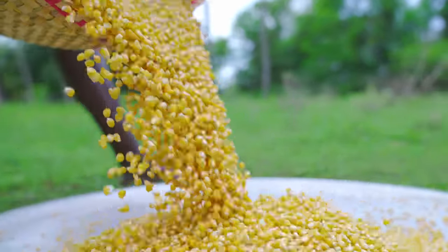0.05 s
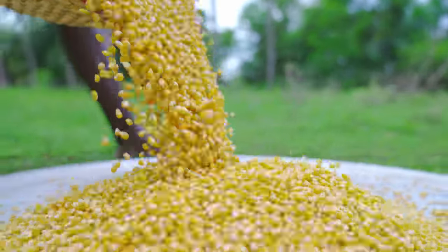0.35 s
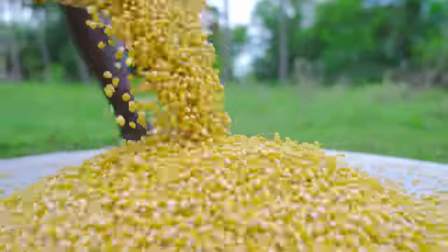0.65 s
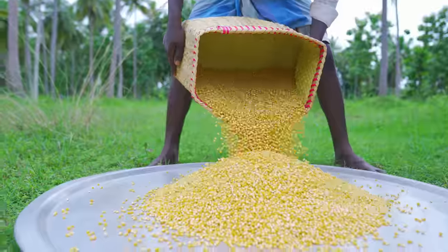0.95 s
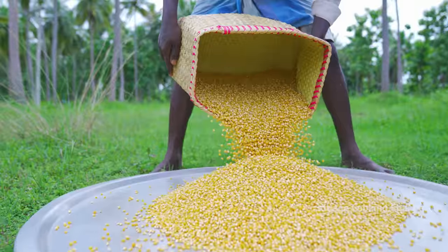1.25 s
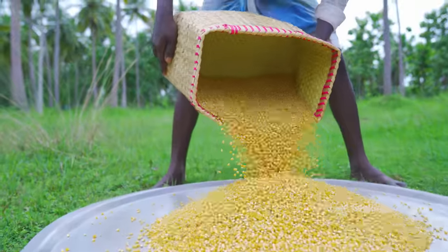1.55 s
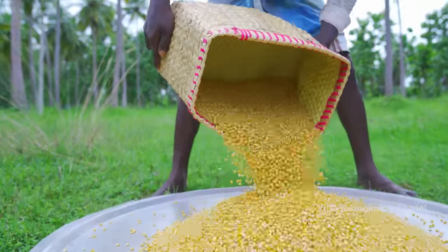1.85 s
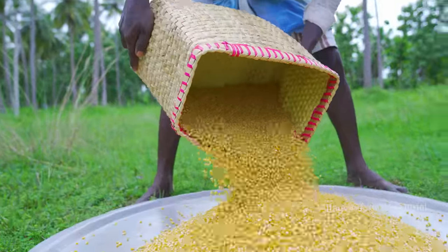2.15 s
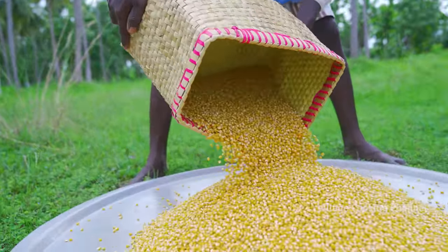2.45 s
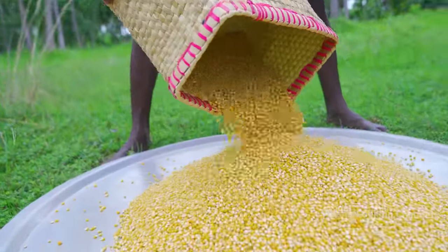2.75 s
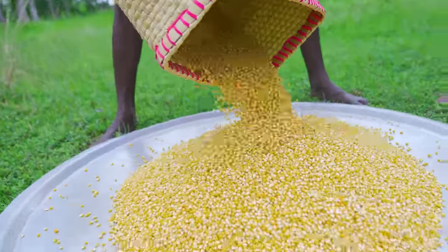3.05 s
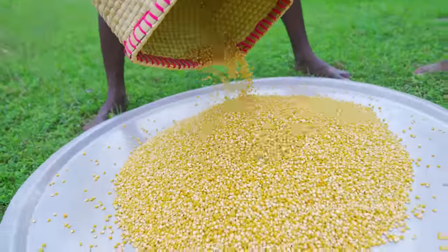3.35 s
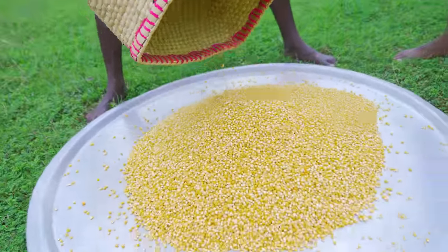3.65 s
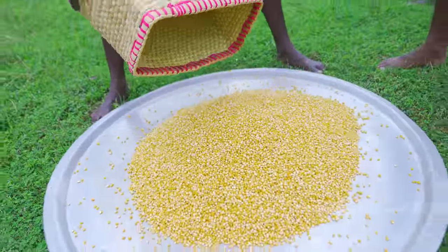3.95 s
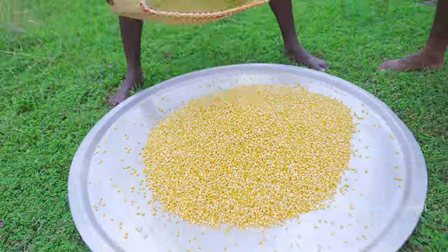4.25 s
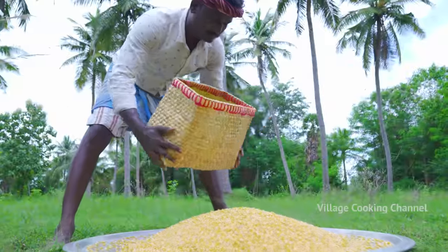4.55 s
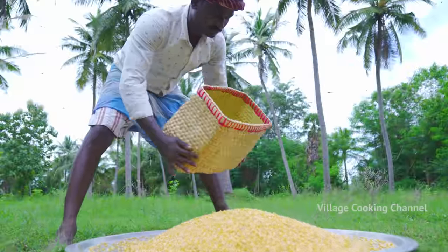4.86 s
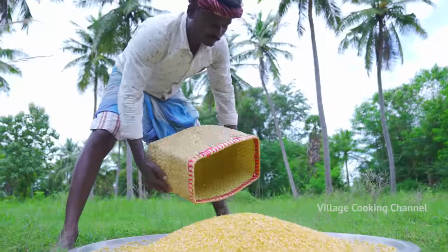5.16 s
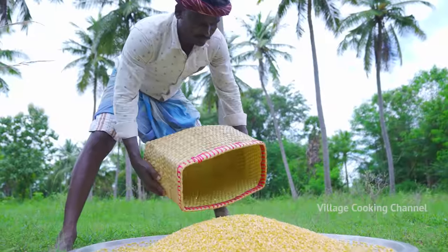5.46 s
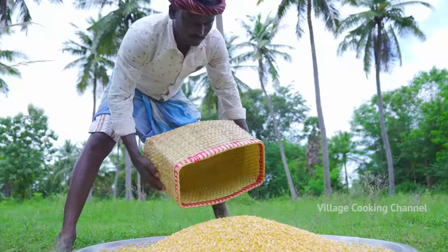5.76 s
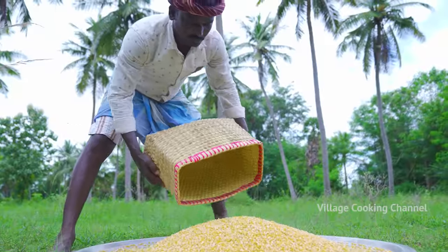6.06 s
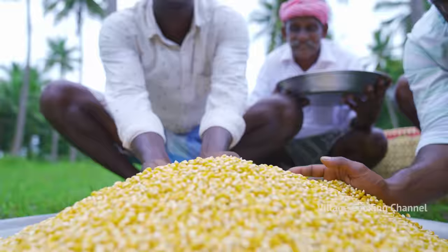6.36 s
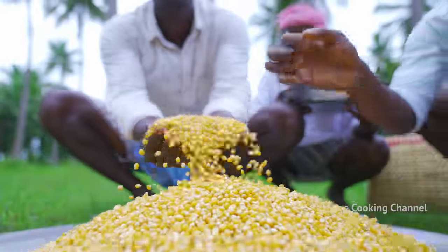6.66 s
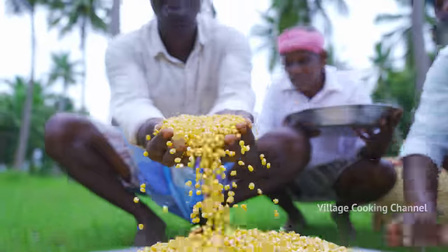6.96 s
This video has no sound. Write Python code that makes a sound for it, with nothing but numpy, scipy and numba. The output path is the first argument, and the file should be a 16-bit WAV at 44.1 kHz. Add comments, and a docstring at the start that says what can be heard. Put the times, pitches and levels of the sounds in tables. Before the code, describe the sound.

Outdoors, with a faint rumble and insects behind, a dense rattle of dry corn lands right by the microphone. The pour continues further away with a few bright pings on the metal plate, then dribbles out as a bird gives short falling whistles. Two hollow thumps on a woven basket lead into rustling and creaking as it is shaken. Hands then dig into the kernels with a gritty swish.

```python
"""A close, dense rattle: dry corn kernels pour from a woven basket onto their heap on a metal plate.
The pour carries on from further off and thins to single clicks while a bird whistles. A palm thumps the
basket twice, the weave rustles and ticks as it is turned and shaken out, and hands scoop into the heap.
Kernels and weave are swarms of tiny clicks, the thumps are ringing wall modes, the bird is a gliding
sine. Under it all lies an outdoor bed of insects and low rumble."""
import sys
import numpy as np
from scipy import signal
from scipy.fft import rfft, irfft
from scipy.io import wavfile
from scipy.ndimage import uniform_filter1d
from numba import njit

SR = 44100
rng = np.random.default_rng(int(sys.argv[2]) if len(sys.argv) > 2 else 0)


def digitize_waveform(pressure):
    """Quantize a signal to 16-bit integers and store it at the path in sys.argv[1].

    Rows of a 2-D input are taken as channels; values are limited to [-1, 1].
    """
    field = np.atleast_2d(pressure).T
    bounded = np.clip(field, -1, 1)
    quanta = np.round(bounded * 32767).astype(np.int16)
    wavfile.write(sys.argv[1], SR, quanta)


N = 309582
TIME = np.arange(N) / SR

# EQ curves, one for each layer: f/Hz, gain/dB
AIR_EQ = [(25, -25), (50, -9), (80, 3), (125, 3.5), (200, -6.5), (320, -17.5), (450, -26), (600, -13.5),
          (900, -33), (1400, -25.5), (2600, -44), (7000, -32), (16000, -38)]
SCOOP_EQ = [(130, -49), (220, -21), (380, -7), (580, -6.5), (780, -9.5), (1030, -7), (1530, -13),
            (1930, -9), (3400, -12.5), (4500, -7), (6000, -2.5), (8100, 0), (10600, -1.5), (16000, -4)]
WEAVE_EQ = [(150, -17), (250, -2.5), (500, 0.5), (900, 0.5), (1900, 0), (3000, 1.5), (5000, 0.5),
            (8000, -2), (12000, -2), (16000, -3)]
TICK_EQ = [(200, -19), (600, -4.5), (2500, -7.5), (5300, -0.5), (8500, -2), (12000, -2.5), (16000, -2.5)]
STRAY_EQ = [(200, -35), (500, -15), (3000, -20.5), (8000, -11.5), (10000, -7.5), (11500, -1.5),
            (13200, -1.5), (14500, -9.5), (16000, -2.5)]
PING_EQ = [(300, -45), (5500, -19), (7000, -5), (7700, 1), (9200, -8), (11000, -12), (16000, -24)]
FAR_EQ = [(120, -39), (200, -22.5), (280, -6.5), (540, -1), (780, -2.5), (1250, -3), (1950, -5.5),
          (3100, -6.5), (4600, -2), (5700, -0.5), (8700, 0), (12000, 1), (15100, 3.5), (16000, -6.5)]
CLOSE_EQ = [(100, -79), (170, -16), (222, -16.5), (318, -3.5), (643, -9.5), (996, -9.5), (1100, -12),
            (1280, -10), (1900, -12.5), (2390, -10), (2730, -10), (4390, -6.5), (12300, 0), (15100, 0.5),
            (16000, -2.5)]
# insect chorus swelling: peak t/s, rise/s, fall/s, level/dB
INSECT_SWELLS = [(5.05, .9, 0.65, -67), (6.24, .15, .15, -62)]
# bird calls: t/s, length before the drop/s, level/dB, swoop from above/Hz
WHISTLES = [(2.26, 0.046, -31, 0), (3.535, 0.12, -36.5, 1199.5), (3.905, .113, -41, 1050)]
# hands dig in, then lift: peak t/s, rise/s, fall/s, level/dB, body re level/dB
SCOOPS = [(6.45, 0.13, 0.19, -26, -6.5), (6.75, 0.2, 0.26, -24.2, -8)]
# clumps slipping off the hands: t/s, relative level/dB
SLIPS = [(6.4518, -12), (6.485, -12), (6.5665, -9), (6.640, -7), (6.6539, -6), (6.6868, -11), (6.7156, -8),
         (6.7427, -8), (6.7975, -11), (6.988, -8.5)]
# basket lifted, turned and shaken: peak t/s, rise/s, fall/s, level/dB, body re level/dB
RUBS = [(4.35, .02, 0.11, -51, -1.5), (4.497, 0.013, 0.027, -36.5, -1.5), (4.56, 0.0094, .022, -35, 1.5),
        (4.62, 0.029, .085, -32, -0.5), (4.735, 0.052, .03, -35, 4.5), (4.768, 0.026, 0.0081, -31, -1),
        (4.91, 0.12, 0.1, -35, -1.5), (5.024, 0.026, .04, -28.5, -2), (5.275, .06, 0.056, -30.5, -3.5),
        (5.35, .1, .11, -41.5, 2.5), (5.603, 0.024, 0.038, -32.5, -4.5), (5.66, .04, 0.081, -43.5, -5.5),
        (5.712, .006, .024, -32.5, -13)]
# ticks and creaks of the weave: t/s, relative level/dB
TICKS = [(4.4965, -13.5), (4.501, -13), (4.5337, -25), (4.7973, -14), (5.127, -26.5), (5.188, -24),
         (5.2607, -21), (5.348, -21), (5.5085, -27), (5.547, -24), (5.5755, -24), (5.6081, -16),
         (5.6252, -17), (5.7072, -18.5), (5.7134, -23), (5.7447, -26), (5.7818, -29), (5.8723, -29.5),
         (5.892, -34), (5.9503, -35), (5.974, -32), (6.011, -34), (6.0676, -29.5), (6.1008, -30),
         (6.1386, -31), (6.2794, -38)]
# ringing strips of the weave: f/Hz, width/Hz, gain/dB
WEAVE_MODES = [(476, 170, -9.5), (1260, 150, -4), (1820, 150, -0.5), (2270, 65, -3), (3450, 400, -6),
               (4380, 180, -1.5), (4750, 110, -3), (5370, 140, -3), (6540, 340, -10), (7470, 130, -5),
               (8100, 150, -14), (10500, 390, -18)]
# palm on the basket, the first thump a double contact: t/s, peak level/dB, contact/s
THUMPS = [(4.478, -23, 0.0014), (4.497, -5, 0.0017), (4.7565, -13.5, 0.0018)]
# modes of the basket wall: f/Hz, relative level/dB, t60/s
WALL_MODES = [(80, -11, 0.107), (127, -2.5, 0.051), (199, 2.5, 0.053), (236, -6, 0.046), (320, -5.5, 0.056),
              (414, -6.5, 0.058), (970, 5, 0.045), (1330, -15, 0.034), (1750, -10, .032), (2300, -11, .035)]
# kernels jumping clear onto the bare plate: t/s, peak level/dB
PINGS = [(.975, -20), (1.095, -21), (1.228, -17), (1.345, -16), (1.443, -16), (1.52, -22), (2.08, -23),
         (2.755, -17), (2.825, -15.5)]
# last single kernels on heap and plate: t/s, relative level/dB
STRAYS = [(3.470, -7), (3.701, -6), (3.7803, -10.5), (3.801, -7), (3.820, -9.5), (3.883, -11), (3.902, -10),
          (3.9222, -5), (3.955, -11.5), (4.020, -16), (4.078, -15), (4.130, -17), (4.1916, -15.5),
          (4.227, -19), (4.2682, -21), (4.3046, -21), (4.323, -20.5), (4.3432, -24)]
# fader ride of the far stream: t/s, relative level/dB
FAR_LEVELS = [(.79, -22.5), (.87, -23), (1.02, -27), (1.7, -27.5), (2.1, -24), (2.45, -24), (2.78, -22.5),
              (3.15, -27.5), (3.3, -28.7), (3.45, -32.7), (3.68, -33), (3.78, -39), (4.03, -40),
              (4.35, -51)]
# flares of the stream's bright peak: peak t/s, rise/s, fall/s, added share
SHINE_FLARES = [(.89, .17, .08, 1.7), (1.33, 0.3, 0.41, .5), (2.75, 0.12, .17, 1.3), (3.9, .45, .6, 0.69)]
# hollow ring of the pour off the plate, sinking as the heap grows, then fainter and higher:
# t/s, f/Hz, added share
PLATE_RING = [(.8, 4650, .65), (1.55, 3980, 0.71), (1.9, 4730, .25), (3.1, 5900, 0.16)]
# cavity of the nearly empty basket: f/Hz, width/Hz, added share
CAVITY_MODES = [(540, 110, .7), (1260, 120, .4), (2030, 420, 1)]

CLOSE_END_S, POUR_END_S, SETTLED_S, SCOOP_START_S = .775, 4.35, 6.25, 6.414
THINNING_S, DRIBBLING_S = (2.75, 3.3), (3.68, 3.9)  # the basket runs low, then only dribbles


def undb(db):
    """Decibels to gain."""
    return 10 ** (np.asarray(db) / 20)


def curves(rows):
    """Automation lanes: each column joined by straight lines in time."""
    times, *columns = np.transpose(rows)
    return [np.interp(TIME, times, column) for column in columns]


def during(start, end, fade=.004):
    """A soft-edged gate between two times."""
    return np.clip((TIME - start) / fade + .5, 0, 1) * np.clip((end - TIME) / fade + .5, 0, 1)


def ramp(start, end):
    """From zero to one between two times."""
    return np.clip((TIME - start) / (end - start), 0, 1)


def swell(peak_s, rise_s, fall_s):
    """A bell envelope that rises to one and falls away."""
    t = TIME - peak_s
    return np.exp(-(t / np.where(t < 0, rise_s, fall_s)) ** 2)


def walk(rate):
    """Random wander with a spread near 1, turning `rate` times a second."""
    return np.interp(TIME * rate, np.arange(4096), rng.standard_normal(4096))


def steady(x, size=3500):
    """Slow leveller to unit rms; single clicks keep their contrast."""
    power = uniform_filter1d(uniform_filter1d(x * x, size), size)
    return x / np.sqrt(np.abs(power) + 1e-18)


def eq(x, points, size=4096):
    """Minimum-phase EQ through (f/Hz, gain/dB) points, so attacks stay sharp."""
    hz, db = np.transpose(points)
    grid = np.maximum(np.fft.rfftfreq(size, 1 / SR), 1)
    gain = undb(np.interp(np.log(grid), np.log(hz), db))
    cepstrum = irfft(np.log(gain))
    cepstrum[1:size // 2] *= 2
    cepstrum[size // 2 + 1:] = 0
    return signal.oaconvolve(x, irfft(np.exp(rfft(cepstrum))))[:len(x)]


def split(x, hz):
    """Crossover: the parts below and above a frequency."""
    return [signal.sosfilt(signal.butter(5, hz, kind, fs=SR, output="sos"), x)
            for kind in ("low", "high")]


@njit
def bandpass(x, hz, width_hz):
    """Sweepable state-variable band-pass, gain 1 at the peak."""
    out, band_state, low_state = np.empty(len(x)), 0., 0.
    for i in range(len(x)):
        g, damping = np.tan(np.pi * hz[i] / SR), width_hz / hz[i]
        band = (band_state + g * (x[i] + 1e-18 - low_state)) / (1 + g * (g + damping))
        band_state = 2 * band - band_state
        low_state += 2 * g * band
        out[i] = damping * band
    return out


def click(crack_s, tail_s, tail_db, size=1400):
    """One hard contact: a crack, then a patter of the neighbours it jostles."""
    t = TIME[:size]
    crack, patter = rng.standard_normal((2, size))
    patter = patter * (rng.random(size) < 1 / 4) * 2
    burst = crack * np.exp(-t / crack_s) + undb(tail_db) * patter * np.exp(-t / tail_s)
    return burst / np.sqrt(np.sum(burst ** 2))


def grains(per_s, spread_db, crack_s, tail_s, tail_db, shapes=12):
    """Random impacts, many weak and a few strong, each with one of several click shapes."""
    hits = rng.random(N) < per_s / SR
    strength = hits * undb(spread_db * np.minimum(rng.exponential(size=N), 4.5))
    shape = rng.integers(0, shapes, N)
    return sum(signal.oaconvolve(strength * (shape == k), click(crack_s, tail_s, tail_db))[:N]
               for k in range(shapes))


def strike(rows, points, crack_s, tail_s, tail_db):
    """An EQ'd click at each (t/s, level/dB), levelled by its loudest millisecond."""
    out = np.zeros(N + SR)
    for s, db in rows:
        burst = eq(click(crack_s, tail_s, tail_db), points)
        peak = np.sqrt(uniform_filter1d(burst ** 2, 44).max())
        start = int(s * SR)
        out[start:start + len(burst)] += undb(db) * burst / peak
    return out[:N]


def strokes(rows, bright, body):
    """Each stroke swells a bright rub and its body; overlapping strokes add in power."""
    gains = np.array([undb(db) * swell(s, rise, fall) for s, rise, fall, db, _ in rows])
    body_gains = gains * undb([row[-1] for row in rows])[:, None]
    return bright * np.linalg.norm(gains, axis=0) + body * np.linalg.norm(body_gains, axis=0)


def outdoors():
    """The bed: a low rumble of open air, a broad shrill of insects and one thin cricket."""
    air = steady(eq(rng.standard_normal(N), AIR_EQ), size=20000) * undb(-49.5 + 1.6 * walk(7))
    shrill_hz = np.full(N, 6500.)
    shrill = bandpass(bandpass(rng.standard_normal(N), shrill_hz, 1390.), shrill_hz, 1400.)
    cricket_hz = 5450 * (1 + .0061 * walk(5))
    cricket = bandpass(bandpass(rng.standard_normal(N), cricket_hz, 450.), cricket_hz, 450.)
    chorus = undb(-68) + sum(undb(db) * swell(s, rise, fall) for s, rise, fall, db in INSECT_SWELLS)
    insects = steady(shrill) * chorus * undb(walk(65))
    cricket = steady(cricket) * undb(-62 + 3 * walk(40)) * during(POUR_END_S, SETTLED_S, fade=.087)
    return air + insects + cricket


def bird():
    """A distant bird: each whistle holds a note and drops away; the later ones swoop in from above."""
    note_hz, swoop_s, drop_hz_per_s, drop_fade_s = 2945, .025, 31000, .022
    out, longest = 0, max(row[1] for row in WHISTLES)
    for start, length, db, swoop_hz in WHISTLES:
        age = np.maximum(TIME - start, 0)
        dropping = np.maximum(TIME - start - length, 0)
        hz = note_hz + swoop_hz * np.exp(-age / swoop_s) - drop_hz_per_s * dropping
        hz = np.maximum(hz, note_hz / 2) * (1 + .0111 * walk(150))
        arch = np.sin(np.pi * ramp(start, start + length))
        sag_db = -6.5 * (length / longest * arch) ** 2  # long whistles soften in the middle
        flutter_db = 3 * walk(70)
        envelope = during(start, np.inf, fade=.011) * np.exp(-(dropping / drop_fade_s) ** 2)
        out = out + np.sin(2 * np.pi * np.cumsum(hz) / SR) * undb(db + sag_db + flutter_db) * envelope
    return out


def scoop():
    """Hands dig into the heap and lift; kernels grind, then swish and trickle off the fingers."""
    grinding = eq(grains(3200, spread_db=2.5, crack_s=.00023, tail_s=.0036, tail_db=-11.5), SCOOP_EQ)
    slips = strike(SLIPS, SCOOP_EQ, crack_s=.0012, tail_s=.005, tail_db=-5)
    swish, swish_hz = 1.1 * swell(6.7, .09, .17), np.full(N, 7900.)
    grinding, slips = (x + swish * bandpass(x, swish_hz, 2300.) for x in (grinding, slips))
    body, bright = map(steady, split(grinding, 4400))
    return strokes(SCOOPS, bright, body) * during(SCOOP_START_S, np.inf, fade=.0022) + undb(-7) * slips


def weave(x, direct_db):
    """The strips of the basket ring briefly after whatever rubs them."""
    ringing = sum(undb(db) * signal.lfilter(*signal.iirpeak(hz, hz / width, fs=SR), x + 1e-18)
                  for hz, width, db in WEAVE_MODES)
    return undb(direct_db) * x + ringing


def basket():
    """The weave rubs under the hands and loose kernels slide inside; it ticks as it settles."""
    rubbing = eq(grains(2600, spread_db=3.5, crack_s=.00014, tail_s=.0036, tail_db=-13), WEAVE_EQ)
    body, bright = map(steady, split(weave(rubbing, direct_db=-2.5), 3000))
    held_creak = (bright + undb(-3) * body) * undb(-61.5) * during(POUR_END_S, 6.3, fade=.17)
    settling = steady(eq(grains(110, spread_db=4, crack_s=.00014, tail_s=.0027, tail_db=-20), TICK_EQ))
    ticks = strike(TICKS, TICK_EQ, crack_s=.0008, tail_s=.004, tail_db=-8)
    snaps = undb(4.5) * ticks + undb(-46.5) * settling * during(POUR_END_S, SETTLED_S, fade=.11)
    ring, treble = split(weave(snaps, direct_db=-12), 7500)
    treble *= undb(-5 * ramp(5.8, 6))  # ticks turn duller as the basket comes to rest
    return strokes(RUBS, bright, body) + held_creak + ring + treble


def thumps():
    """A palm pushes on the basket wall, which booms briefly."""
    t, out = TIME[:SR // 4], np.zeros(N)
    ring = sum(undb(db - 60 * t / t60) * np.cos(2 * np.pi * hz * t) for hz, db, t60 in WALL_MODES)
    for s, db, contact_s in THUMPS:
        push = np.sin(np.pi * np.minimum(t / contact_s, 1))
        boom = signal.fftconvolve(ring, push)[:len(t)]
        _, boom = split(boom, 48)  # a small wall cannot radiate the deepest bass
        start = int(s * SR)
        out[start:start + len(t)] += undb(db) * boom / np.abs(boom).max()
    return out


def strays():
    """Stray kernels ping on the plate; the last land one by one, with small bounces skittering between."""
    bounces = grains(220, spread_db=2.2, crack_s=.0003, tail_s=.003, tail_db=-16)
    gain = undb(-43) + undb(-28.5) * swell(4.01, .24, .08)  # builds until the basket is empty
    skitter = steady(eq(bounces, STRAY_EQ)) * gain * during(THINNING_S[1], POUR_END_S)
    hits = strike(STRAYS, STRAY_EQ, crack_s=.0008, tail_s=.005, tail_db=-7)
    pings = strike(PINGS, PING_EQ, crack_s=.002, tail_s=.005, tail_db=-8)
    return skitter + undb(-3) * hits + pings


def plate_reflection(stream, heap):
    """The plate mirrors the stream, later as the heap grows, until the heap covers it."""
    echo, _ = split(stream, 9700)  # the rough heap scatters the finest treble
    delay_s = .000597 + .00074 * heap
    bare = 1 - ramp(1.2, 2.4)
    return .22 * bare * np.interp(TIME - delay_s, TIME, echo)


def shine(stream, heap):
    """A bright peak flares now and then, climbing ever faster as the basket empties."""
    share = .1 + sum(added * swell(s, rise, fall) for s, rise, fall, added in SHINE_FLARES)
    hz = 7330 + 4900 * heap ** 1.65
    return share * bandpass(stream, hz, 1100.)


def cavity_ring(stream):
    """The last kernels slide over the bared weave and ring the hollow basket."""
    ring = sum(share * bandpass(stream, np.full(N, float(hz)), float(width))
               for hz, width, share in CAVITY_MODES)
    return ring * swell(3.16, .36, .26)


def far_stream():
    """Kernels rattle on the heap; as it grows and the stream thins, hiss and a dull body come forward."""
    heap, thin, dribble = ramp(CLOSE_END_S, POUR_END_S), ramp(*THINNING_S), ramp(*DRIBBLING_S)
    kernels_per_s = np.interp(thin + dribble, [0, 1, 2], [6100, 5200, 2200])
    impacts = grains(kernels_per_s, spread_db=1, crack_s=.00024, tail_s=.0048, tail_db=-12.5)
    clumps = undb(.92 * walk(110))
    stream = eq(impacts * clumps, FAR_EQ)
    stream += plate_reflection(stream, heap)
    stream += shine(stream, heap)
    ring_hz, ring_share = curves(PLATE_RING)
    stream += ring_share * bandpass(stream, ring_hz, 1100.)
    body, bright = split(stream, 2540)
    rattle, hiss = split(bright, 9160)
    body_db = -11.5 + 4.5 * heap + 4.5 * thin
    hiss_db = -1.5 + 5.5 * heap + 3.5 * thin - 5 * dribble
    mix = steady(rattle) + undb(body_db) * steady(body) + undb(hiss_db) * steady(hiss)
    mix += cavity_ring(mix)
    fader_db, = curves(FAR_LEVELS)
    return mix * undb(fader_db) * during(CLOSE_END_S, POUR_END_S, fade=.015)


def close_stream():
    """Thousands of kernels a second land in clumps, right up close."""
    impacts = grains(7000, spread_db=1.5, crack_s=.0002, tail_s=.0023, tail_db=-14)
    clumps = undb(1.03 * walk(128.8))
    return steady(eq(impacts * clumps, CLOSE_EQ)) * undb(-15.2) * during(-1, CLOSE_END_S, fade=.0098)


def scene():
    """All layers in one mono mix, the same in both ears."""
    mono = close_stream() + far_stream() + strays() + thumps() + basket() + scoop() + bird() + outdoors()
    return np.array([mono, mono])


def record(dry):
    """A steep low-pass takes off the very top."""
    top_hz = 15850
    return signal.sosfilt(signal.ellip(12, .1, 80, top_hz, fs=SR, output="sos"), dry)


dry = scene()
out = record(dry)
digitize_waveform(out)
```